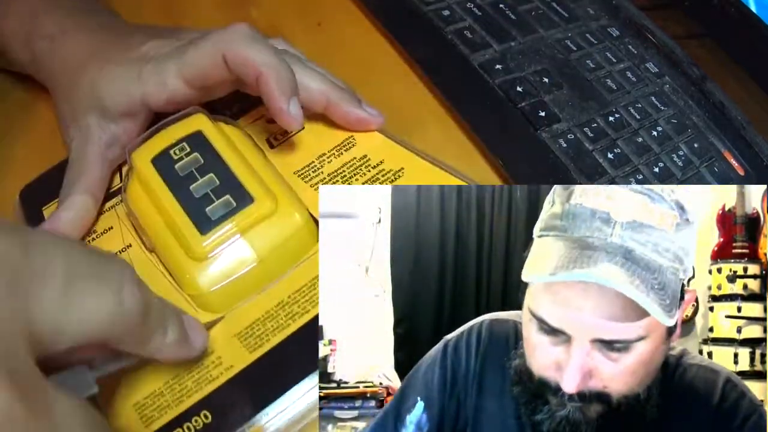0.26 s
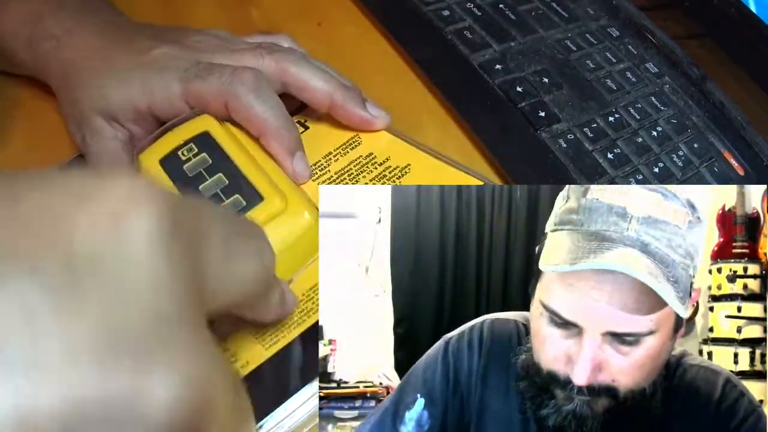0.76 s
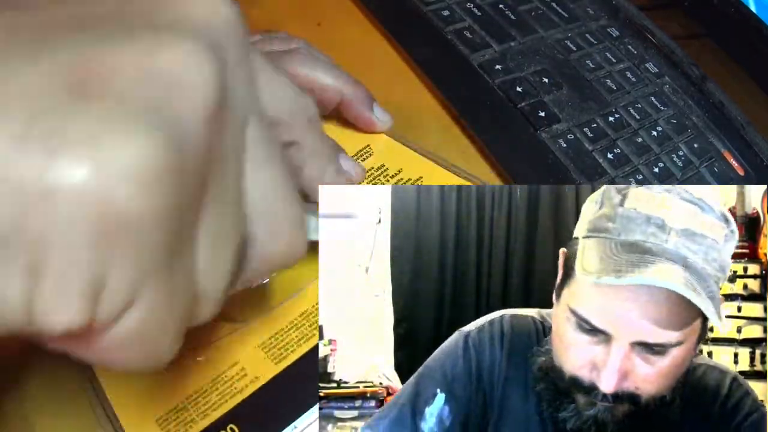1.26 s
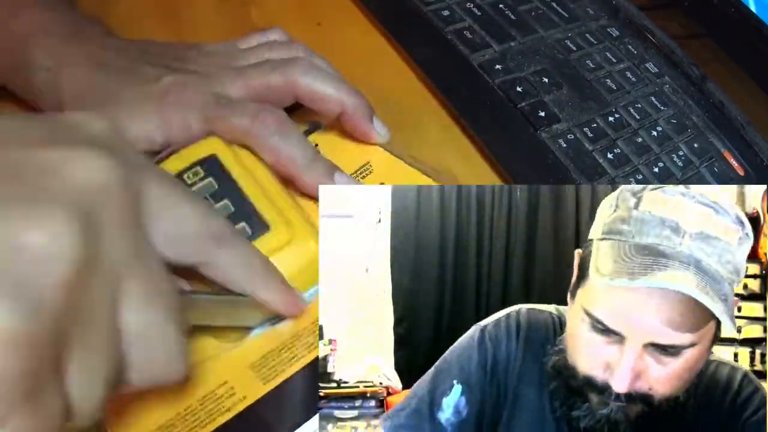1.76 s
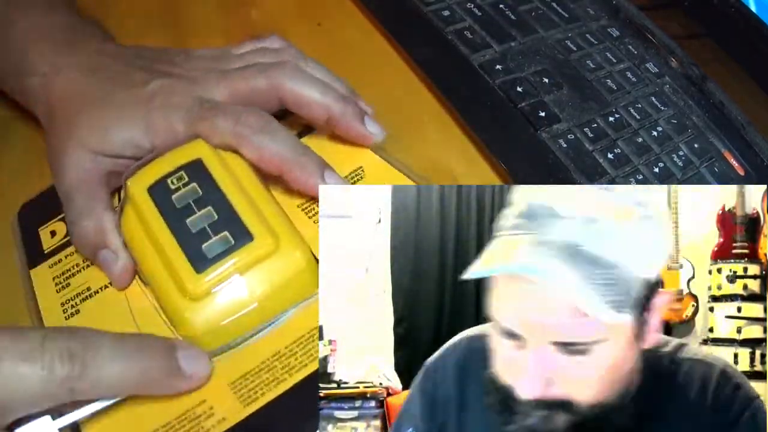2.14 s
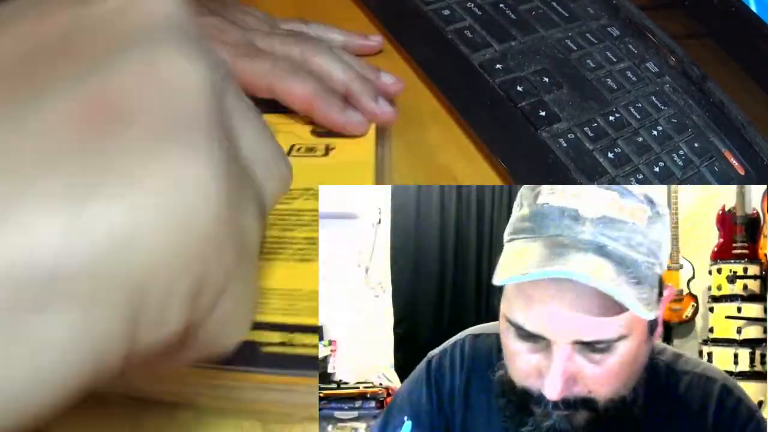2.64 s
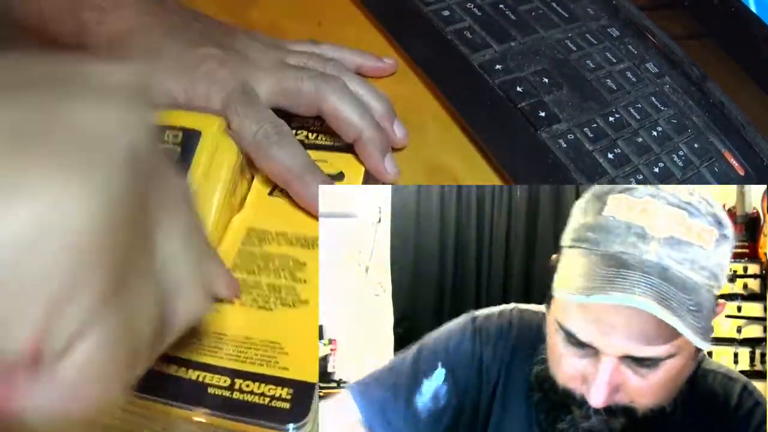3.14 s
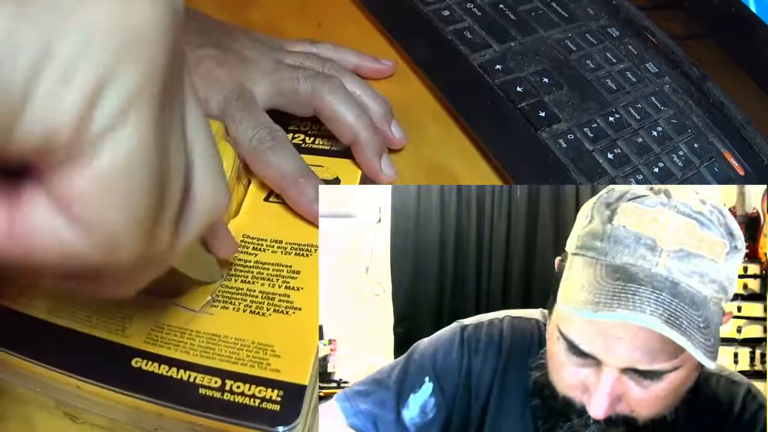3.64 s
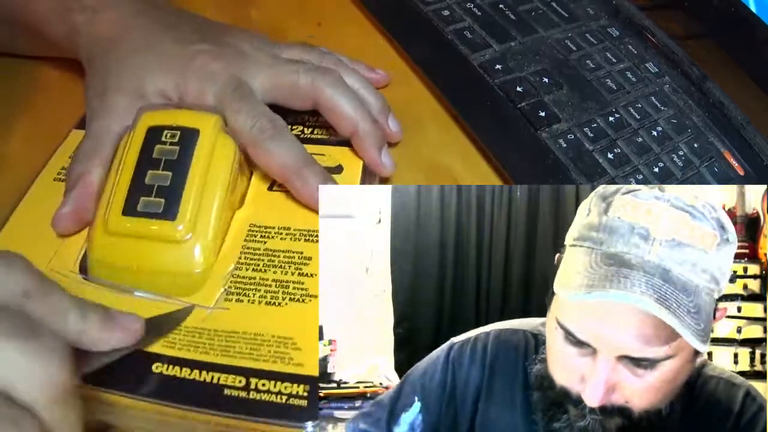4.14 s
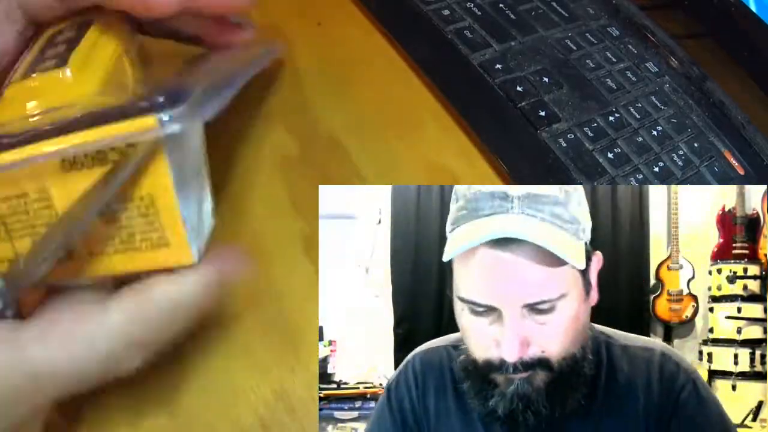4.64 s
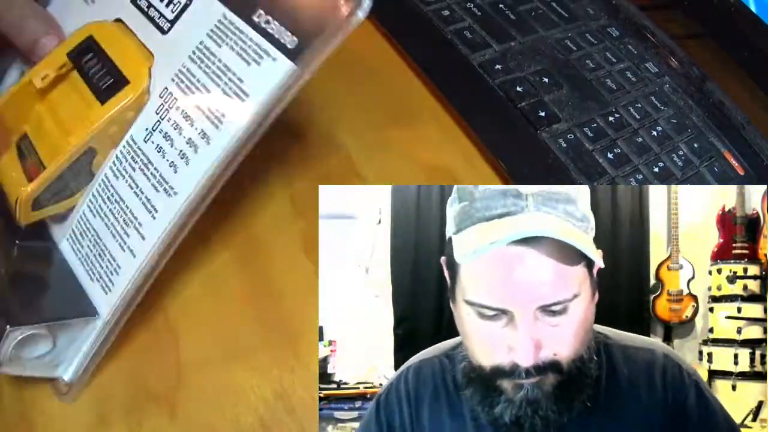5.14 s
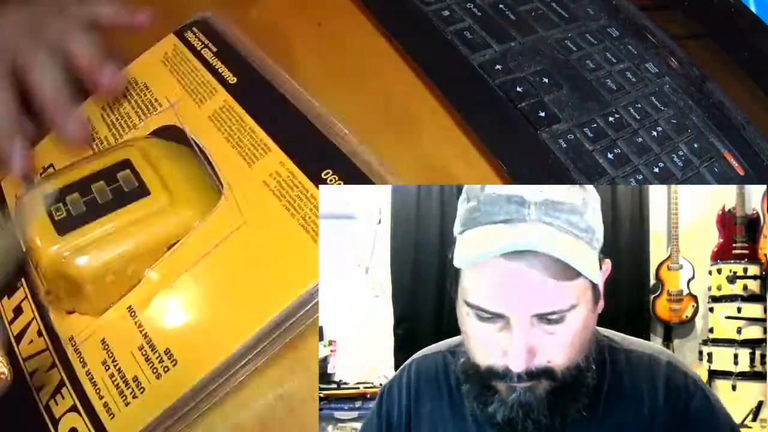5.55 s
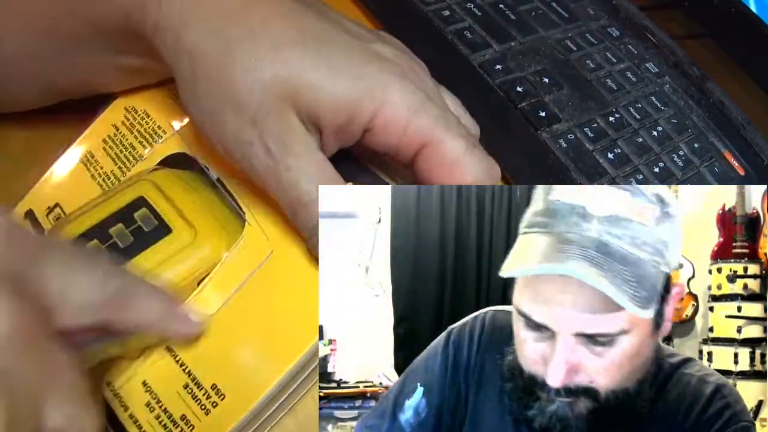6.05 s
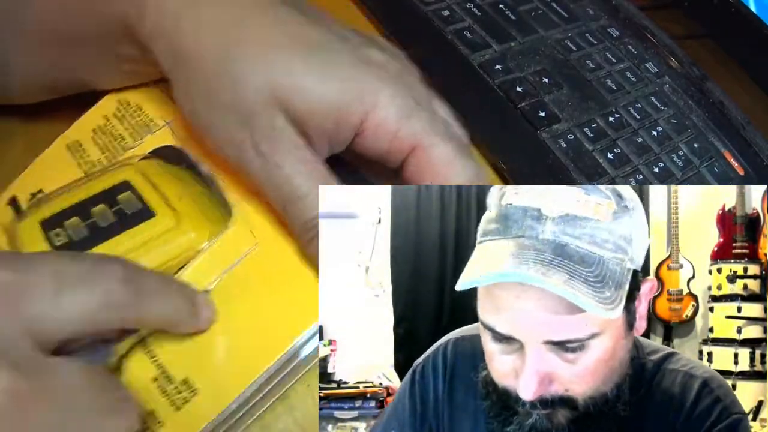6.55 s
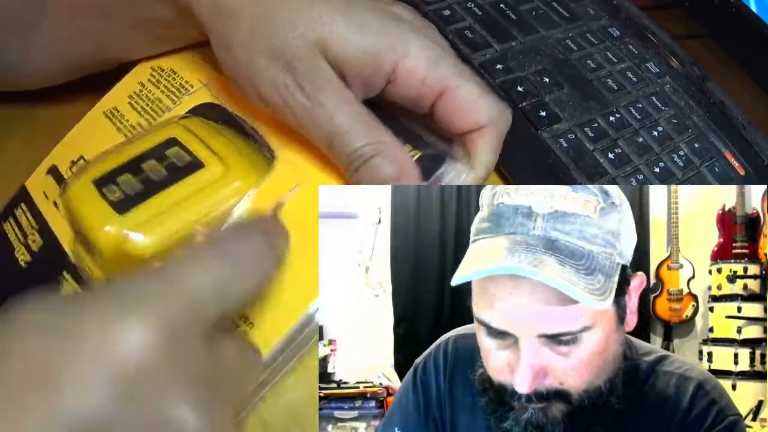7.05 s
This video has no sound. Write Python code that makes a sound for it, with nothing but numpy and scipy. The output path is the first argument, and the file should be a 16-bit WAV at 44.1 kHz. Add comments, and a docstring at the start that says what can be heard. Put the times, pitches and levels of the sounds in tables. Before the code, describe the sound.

Irregular crackling of hard clear plastic being cut and pried by hand, very close and dry with only tiny reflections. Light clicks grow into sharp pops, ease while the pack is shifted and knocked on the wooden desk, then return with rasping scrapes and loud snaps. A low rubbing rumble runs underneath, with steady quiet fan noise and thin whine, slightly more hum near the end.

```python
"""On a wooden desk, close to a small microphone, a blade pries a stiff plastic blister pack open.
Behind it, computer fans hiss (shaped noise), hum and whine (sine waves).
Desk and shell are sets of fading tones, or modes: random pushes make the desk rumble, bumps make it knock.
Scattered clicks make the shell creak, dense clicks scrape it, and sudden slips crack and pop it.
Short echoes surround the pack."""
import sys
import numpy as np
from scipy import signal
from scipy.fft import rfft, irfft
from scipy.io import wavfile
from scipy.ndimage import uniform_filter1d

SR = 44100
rng = np.random.default_rng(int(sys.argv[2]) if len(sys.argv) > 2 else 0)


def write(x):
    x = np.atleast_2d(x).T
    wavfile.write(sys.argv[1], SR, np.round(np.clip(x, -1, 1) * 32767).astype(np.int16))


N = 321930
TIME = np.arange(N) / SR


def gain_of(db):
    """Turn decibels into a multiplier for the sound wave."""
    return 10 ** (np.asarray(db) / 20)


def evened(x):
    """Scale a sound to an average (rms) strength of 1."""
    return x / np.sqrt(np.mean(x ** 2) + 1e-20)


def add(mix, start_s, sound):
    """Lay a sound into the mix at its start time, cut off at the end of the mix."""
    part = mix[max(round(start_s * SR), 0):][:len(sound)]
    part += sound[:len(part)]


def wander(fastest_hz):
    """Slow random curve of rms 1: twelve sine waves with random starting points."""
    t = TIME[::200]
    curve = sum(np.sin(2 * np.pi * (hz * t + rng.random()))
                for hz in np.geomspace(fastest_hz / 8, fastest_hz, 12))
    return np.interp(TIME, t, evened(curve))


def grit(clicks_per_s, spread_db):
    """Random clicks of either sign, a few of them large."""
    size = gain_of(spread_db * np.minimum(rng.exponential(1, N), 4))
    signed = size * rng.choice([-1., 1.], N)
    return signed * (rng.random(N) < clicks_per_s / SR)


def ring(modes, favour_hz=1, favour_db=0, width=1, size=768):
    """A part's answer to one click: modes near a favoured pitch ring louder; little radiates outside their range."""
    hz, level_db, t60_s = np.transpose(modes)[:, :, None]
    t = np.arange(size) / SR
    distance = np.log(hz / np.atleast_1d(favour_hz)) / width
    level_db = level_db + favour_db * np.exp(-distance ** 2).max(1, keepdims=True)
    sign = (-1) ** np.arange(len(modes))[:, None]
    waves = sign * gain_of(level_db - 60 * t / t60_s) * np.sin(2 * np.pi * hz * t)
    radiated_band = signal.butter(4, [0.66 * hz.min(), 1.57 * hz.max()], "band", fs=SR)
    return signal.lfilter(*radiated_band, waves.sum(0))


def octaves(part, hz):
    """How many octaves the middle of a part's modes lies above hz."""
    return np.mean(np.log2(np.transpose(part)[0] / hz))


def bent(part, favoured_hz, chance, reach=.12):
    """The part flexes until a mode sits on a favoured pitch within reach; else it flexes by chance."""
    # chance and reach are natural logs of a pitch ratio
    gaps = np.log(np.divide.outer(favoured_hz, np.transpose(part)[0])).ravel()
    nearest = gaps[abs(gaps).argmin()]
    stretch = np.exp(nearest if abs(nearest) < reach else chance)
    return np.multiply(part, [stretch, 1, 1])


def blow(slip, fall_db_per_ms, response, peak_db, first_db=12, rattle_db=-13, rattle_t60_s=.06):
    """One sudden slip, a spray of tiny ones and a faint rattle ring one part."""
    t = np.arange(len(slip)) / SR
    spray = gain_of(-max(fall_db_per_ms, .5) * 1000 * t)
    # harder breaks rattle more
    rattle = gain_of(rattle_db + 0.2 * peak_db - 60 * t / rattle_t60_s)
    soft_end = np.cos(np.pi / 2 * (t / t[-1]) ** 2)
    soft_start = np.minimum(t / 0.00041, 1) ** 2
    first_slip = gain_of(first_db) * np.exp(-((t - .0008) / .00003) ** 2)
    drive = slip * (spray + rattle) * soft_end * soft_start + first_slip
    sound = np.convolve(drive, response)
    return gain_of(peak_db) * sound / abs(sound).max()


# Colour of the fans' air noise: pitch_hz, relative_level_db (only the shape counts)
AIR_COLOUR = [(35, -68), (60, -30.5), (128, -14.5), (293, -82.5), (350, 0.5), (469, -34), (641, 6),
              (1120, -5.5), (1530, -3.5), (2190, -10), (2560, -2.5), (4890, -8), (10000, -16),
              (11700, -18.5), (12500, -55.5), (16200, -76), (22000, -120)]
# Blade tones: pitch_hz, level_db (rms, about which each wavers)
BLADE_TONES = [(240, -84), (301, -79), (479, -73), (603, -71), (646, -73), (926, -75), (958, -76)]
# Blade tones that join late: pitch_hz, level_db (rms, about which each wavers)
LATE_TONES = [(417, -72), (500, -74), (597, -76)]
# Motor whine, multiple of the base pitch: level_db (rms, before a shared wavering lift)
WHINE_TONES = {15: -82, 16: -79, 17: -75, 19: -84, 20: -78, 24: -83, 26: -80, 27: -83}
AIR_DB, WHINE_BASE_HZ, LATE_START_S = -61, 231.1, 5.55


def wavering(tones, sway_cycles):
    """Sine waves whose loudness and timing drift slowly."""
    return sum(gain_of(db + 1.5 * wander(3)) * np.sin(2 * np.pi * (hz * TIME + sway_cycles * wander(3)))
               for hz, db in tones)


def fans():
    """Steady air noise, wavering blade tones and a thin motor whine."""
    hz, level_db = np.transpose(AIR_COLOUR)
    colour_db = np.interp(np.log(np.fft.rfftfreq(N, 1 / SR) + 1), np.log(hz), level_db)
    noise = irfft(rfft(rng.standard_normal(N)) * gain_of(colour_db), N)
    air = gain_of(AIR_DB + 1.1 * wander(1.2)) * evened(noise)
    late_fade_in = np.clip((TIME - LATE_START_S) / 0.25, 0, 1)
    hum = wavering(BLADE_TONES, .08) + wavering(LATE_TONES, .1) * late_fade_in
    whine = sum(gain_of(db) * np.sin(2 * np.pi * (multiple * WHINE_BASE_HZ * TIME + rng.random()))
                for multiple, db in WHINE_TONES.items())
    whine_lift = gain_of(1.5 + 1.1 * wander(2.1))
    # a sine wave of rms 1 peaks at the square root of 2
    return air + np.sqrt(2) * (hum + whine_lift * whine)


# Modes of the desk top, before favouring and bending: pitch_hz, relative_level_db, t60_s (time to fade by 60 dB)
DESK_MODES = [(456.7, 6.5, 0.036), (561.4, 7.5, 0.029), (617.6, 9.5, 0.031), (693.3, 7.5, 0.033),
              (789, 5.5, 0.021), (970, 2, 0.022), (380, -14, 0.02)]
# Hands pressing the pack on the desk, joined by straight lines: time_s, level_db (rms)
RUMBLE_LEVELS = [(0, -54.5), (.5, -55), (1.15, -54), (1.5, -59.5), (2.3, -55.5), (2.55, -60), (2.72, -53),
                 (2.8, -46), (3.33, -50.5), (3.38, -57), (4.7, -56), (5.3, -56.5), (5.5, -50.5),
                 (5.62, -63), (6.05, -55.5), (6.2, -56.5), (6.5, -49.5), (6.75, -58), (7.3, -59)]


def rumble():
    """Rubbing hands give the desk many small uneven pushes that flutter."""
    flutter = gain_of(4.5 * wander(70))
    pushes = signal.oaconvolve(grit(900, 4.0) * flutter, np.hanning(8))[:N]
    desk = ring(DESK_MODES, favour_hz=697, favour_db=9, width=0.45, size=2048)
    rubbed = evened(signal.oaconvolve(pushes, desk)[:N])
    return gain_of(np.interp(TIME, *np.transpose(RUMBLE_LEVELS))) * rubbed


# Bumps on the desk: start_s, peak_db (of the ringing), pitch_hz (that the spot favours)
BUMPS = [(0.009, -37, 588), (0.02, -39.5, 470), (0.109, -34, 686), (0.178, -42, 589), (0.258, -40, 660),
         (0.334, -41.5, 610), (0.396, -36, 670), (0.487, -48, 760), (0.576, -33.5, 748), (0.617, -41, 620),
         (0.654, -36.5, 597), (0.753, -39.5, 636), (0.961, -32.5, 684), (1.192, -35, 462),
         (1.224, -32, 500), (1.251, -36.5, 503), (1.334, -30.5, 597), (1.392, -28, 482), (1.417, -28, 480),
         (1.612, -29, 504), (1.754, -21, 474), (1.87, -29, 482), (2.229, -30, 560), (2.242, -38, 630),
         (2.273, -36, 647), (2.33, -35, 506.6), (2.753, -35.5, 600), (2.78, -40, 659), (2.837, -34, 616),
         (2.885, -41, 582), (2.906, -41, 650), (2.938, -26.5, 481), (3.006, -41, 630), (3.08, -42, 650),
         (3.103, -41, 610), (3.136, -32.5, 625), (3.165, -36.5, 700), (3.203, -36, 600), (3.223, -40, 608),
         (3.265, -36, 636), (3.305, -42, 677), (3.56, -31, 474), (3.595, -35, 617), (3.936, -21, 492),
         (4.074, -45, 616), (4.089, -40, 603), (4.112, -25, 488), (4.352, -37, 515), (4.415, -27, 652),
         (4.71, -42, 950), (4.918, -25.5, 542), (4.983, -38.5, 547), (4.995, -34, 654), (5.184, -31, 482),
         (5.423, -35.5, 620), (5.458, -22.5, 676), (5.475, -23, 655.5), (5.487, -29.5, 650),
         (5.501, -37, 646), (5.519, -29.5, 671), (5.563, -22, 493), (5.818, -39.5, 585),
         (6.104, -35.5, 597), (6.151, -26, 443), (6.158, -37, 770), (6.487, -30, 558), (6.52, -36, 607),
         (6.605, -29.5, 577), (6.617, -28, 494), (6.817, -32, 455), (7.065, -38, 640), (7.275, -40, 471)]
PUSH_DB, PUSH_S = -40, .009  # low shove with each bump: level relative to the bump's peak, length


def knocks():
    """Soft bumps of pack and hands ring the desk top and send a low shove through it."""
    out = np.zeros(N)
    slips = rng.standard_normal((len(BUMPS), 600))
    for (start_s, peak_db, hz), slip in zip(BUMPS, slips):
        desk = ring(bent(DESK_MODES, [hz], 0), hz, favour_db=7.5, width=0.054, size=2048)
        soft_desk = np.convolve(desk, np.hanning(10))
        add(out, start_s - .001, blow(slip, 9.1, soft_desk, peak_db))
        shove = gain_of(peak_db + PUSH_DB) * np.hanning(round(PUSH_S * SR))
        add(out, start_s - .001, shove)
    return out


# Modes of the four shell parts, lowest part first, before favouring and bending:
# pitch_hz, relative_level_db, t60_s (time to fade by 60 dB)
CARD_MODES = [(1190, 2.5, 0.0068), (1530, 4.2, 0.011), (2041, 3.3, 0.012)]
DOME_MODES = [(2421, 0.5, 0.0072), (2687, 0, 0.0055), (3199, -4.5, 0.0093)]
RIM_MODES = [(3572, 2.5, 0.0071), (4330, 6, 0.0037), (4700, 5.5, 0.0056), (5063, 8, 0.0034),
             (5520, 3.5, 0.0063), (6180, 0, 0.0056)]
EDGE_MODES = [(7124, 7, 0.0015), (8320, 1.5, 0.0047), (8960, -1, 0.0046), (10250, 5, 0.0027),
              (11480, -2.5, 0.0056)]
SHELL = CARD_MODES, DOME_MODES, RIM_MODES, EDGE_MODES
TICKS_PER_S, TICKS_DB = 13, -73.5  # small creaks of the strained shell: rate and rms level in each part


def creaks():
    """Sparse small ticks of the strained shell, each ringing one of its three lower parts."""
    ticks = sum(evened(signal.oaconvolve(grit(TICKS_PER_S, 3.0), ring(part))[:N]) for part in SHELL[:3])
    return gain_of(TICKS_DB) * ticks


# Scrapes along the plastic: start_s, length_s, level_db (rms, for a part at the centre pitch, before fading),
# brightness_db_per_octave, hollowness_db_per_octave_squared
STROKES = [(0.317, 0.02, -67.5, 5.5, 6.5), (0.343, 0.015, -72, 13, 4), (0.362, 0.035, -56, 3.5, 3.5),
           (1.245, 0.05, -43.5, 1.5, 0.5), (1.299, 0.018, -62, 3, 2), (1.365, 0.02, -61.5, 0.5, 6.5),
           (1.389, 0.018, -54.5, 6.5, 1.5), (1.758, 0.024, -47, 3, 2), (1.892, 0.013, -53, -1, 3.5),
           (1.937, 0.039, -60.5, 0.5, 5.5), (3.126, 0.063, -47, 2, -5), (3.263, 0.024, -46.5, -2, 0.5),
           (3.555, 0.044, -56, -4, 2.5), (4.064, 0.03, -72, 8, 2), (4.504, 0.028, -47.5, -0.5, -3),
           (4.644, 0.026, -51, 1, -0.5), (4.889, 0.015, -70.5, 3.5, 11.5), (4.974, 0.026, -77.5, 1, 8),
           (5.4, 0.084, -66, 4, 7), (5.427, 0.051, -51, 0, 6), (6.181, 0.037, -49.5, -1.5, -1),
           (6.461, 0.02, -34.5, 2.5, -3.5), (6.598, 0.041, -37.5, -3, -3.5),
           (6.957, 0.13, -60.5, -0.3, -5.5), (7.27, 0.02, -49, -2, -1)]
SCRAPE_CENTRE_HZ = 3800
SCRAPE_FADE_DB = -3  # a scrape weakens along its length


def fading(size):
    """Quick start, slow weakening, soft end."""
    return signal.windows.tukey(size, .25) * gain_of(SCRAPE_FADE_DB * np.linspace(0, 1, size))


def scrapes():
    """Dense stick-slip clicks under the blade ring every part of the shell."""
    out = np.zeros(N)
    for part in SHELL:
        loudness = np.zeros(N)
        away = octaves(part, SCRAPE_CENTRE_HZ)
        for start_s, length_s, level_db, bright_db, hollow_db in STROKES:
            part_db = level_db + bright_db * away + hollow_db * away ** 2
            add(loudness, start_s, gain_of(part_db) * fading(round(length_s * SR)))
        response = ring(part, 2800, favour_db=8, width=.3)
        out += loudness * evened(signal.oaconvolve(grit(3500, 4.4), response)[:N])
    return out


# Cracks of the shell: start_s, peak_db (for a part at the leading pitch),
# pitch_hz (that the spot favours; several for rich breaks, the first leads), loss_below_db_per_octave,
# loss_above_db_per_octave (negative gains), fall_db_per_ms (of the break; at least 0.5 is used)
BREAKS = [(0.0425, -38, (2090, 2500), -20, 1.5, 20), (0.1087, -25.5, 2400, 19, 3, 5.5),
          (0.2391, -34.5, 2580, 13, 13, 3), (0.331, -34, 10000, 26, 4.0, 1),
          (0.4859, -25, 1970, 1, 4.0, 28), (0.5013, -15.5, 2470, 30, 4, 6),
          (0.575, -24.5, 2470, 11, 0.5, 7), (0.616, -37, 2580, 11.0, 6, 4.5),
          (0.6382, -36, 2500, 3, -0.5, 4), (0.6556, -35, 2620, 6, 0, 3.5), (0.7728, -32, 2670, 10, 6, 23),
          (0.852, -32.5, 2450, -1, 1, 4), (0.8745, -32.5, 10100, 8, 4.0, 2),
          (0.8941, -24.5, 2490, 22, 7.5, 4), (0.9617, -26, (1550, 6300), 10.0, 3, 6),
          (1.0488, -22.5, (1490, 2530), 1, 3.5, 15), (1.1895, -33.5, 2546, 20, 10, 2.0),
          (1.224, -22.5, (2600, 4200), 22, 6.5, 5), (1.2457, -33, 2070, -10, 9, 9),
          (1.2532, -31, 2970, 7, 6, 1), (1.3087, -43, 3000, 12, 5, 1.5), (1.334, -27, 5470, -0.5, -2, 3.5),
          (1.3425, -27, 2580, 8, 2.5, 19), (1.3561, -31.5, 2630, 6.0, 5, 30.0),
          (1.3928, -36, 1450, 10.0, 0, 4), (1.417, -44, 1950, -16, -0.5, 2.5),
          (1.4701, -39, 3130, 1, -1.5, 1.5), (1.4809, -32.5, 2400, 11, 6, 2), (1.6112, -17.5, (1460, 5600),
          10.0, 3, 5.5), (1.7092, -42.5, 3200, -2, -0.5, 2), (1.7365, -36, 2020, 1.0, 11, 2.5),
          (1.7549, -29.5, 2480, 3, 5, 0.5), (1.765, -23.5, 2700, -7, -3, 1),
          (1.769, -8.5, (5200, 1480, 8360), 3.5, 0.5, 12), (1.7937, -21.5, 6800, 4.5, -2, 17),
          (1.8675, -19.5, 1460, 10.0, 1, 6.5), (1.8711, -19.5, 3900, 3.5, 9, 19),
          (1.9308, -26, 2230, -2, -1, 6), (1.955, -34, 1440, 13, 4.5, 1.5),
          (2.0475, -28.5, 2100, -1, 2, 23), (2.1475, -6, 3470, 39, 23.5, 26),
          (2.2305, -18, 3570, 8, 16, 30.0), (2.2479, -5, 3600, 43, 12.5, 32),
          (2.3211, -15.5, 3480, 18, 11, 2), (2.33, -3, (4440, 3100), 13, 4.5, 26),
          (2.3579, -11, (8300, 3370), 9, 7, 17.5), (2.3978, -37.5, 2530, 13, 5, 2),
          (2.6327, -28.5, 1570, 13, 4.5, 2), (2.69, -38.5, 2540, 5.5, -1, 14),
          (2.7228, -36, 2680, 14, 18, 3), (2.7355, -30, 2630, 9, 10, 2), (2.8323, -38.5, 2700, -3, 2, 1),
          (2.839, -33, 1795, -25, 0, 5), (2.9358, -15.5, 4030, 6, 9.5, 24),
          (2.9397, -16.5, 1470, 10.0, 4.5, 6), (2.9508, -32.5, 2580, 1, 9, 2), (2.97, -38, 2500, 6, 7, 4),
          (2.9828, -35, 1600, 9.0, 8, 7), (3.0183, -27.5, 1804, -8, 8, 30.0),
          (3.1322, -23, 3100, 1.5, 1.5, 1), (3.1485, -11, 7600, 23, -1, 26), (3.1648, -12, (2580, 1930),
          8.5, 20, 33), (3.206, 2, (5560, 10400, 3280), 18, 13.5, 10), (3.243, -40, 4000, 16, 10, 2),
          (3.266, -31, 3330, -0.5, 4, 11), (3.272, -22.5, 1590, 10.0, 4, 30.0),
          (3.3119, -35, 2850, 11, 10.0, 2), (3.3465, -15.5, (3280, 8600), 18, 3, 32),
          (3.4455, -28.5, 3596, 9, 25, 1), (3.4716, -35, 8440, 7, 0.0, 15), (3.543, -39, 3590, 2, 22, 0),
          (3.549, -24, 3600, 10, 19, 14.0), (3.556, -27, 3270, 6, 19, 2), (3.5613, -32.5, 2680, 13, 1, 7),
          (3.5719, -34.5, 1700, -5.0, -0.5, 2), (3.5793, -30, 3730, 20, 9, 13),
          (3.5876, -16, 4880, 5.5, 30, 7), (3.612, -38.5, 1570, 10, 20, 2),
          (3.672, -31.5, 8100, 4, 11, 3.5), (3.7325, -28.5, 1600, 10.0, -2, 3),
          (3.7705, -21, 7600, 30, -10, 26), (3.8014, -26, 5300, 2, 5, 36), (3.9061, -17, (3800, 2460),
          11, 11.5, 35), (3.9371, -6.5, (2560, 4330, 1400), 6.5, 5.5, 13.5), (3.9948, -22, (3330, 2230),
          2.5, 1, 32), (4.0665, -34.5, 11300, 12, 4.0, 1), (4.1132, -17, (3700, 1300), 0.5, 8.5, 26),
          (4.355, -27.5, (1900, 4060), 5, -0.5, 24), (4.4156, -28, (1380, 5640), 11, 0.5, 4),
          (4.5072, -20, 7230, 7, 3, 3), (4.6267, -34.5, 3200, 8, -1.5, 15), (4.6343, -18.0, (3000, 2200),
          6.5, 16, 16), (4.6475, -21.5, 6290, 14, 8, 0.5), (4.6568, -21, 2570, 24.5, 14, 14.0),
          (4.661, -19.5, 2930, 10.5, 19, 4.5), (4.7101, -23.5, (2350, 1290), -7.5, 6.5, 24),
          (4.835, -39, 2120, 7, 15, -0.5), (4.8475, -35, 2350, 11, 15, 5), (4.874, -37, 2150, 5.5, 23.5, 1),
          (4.9186, -17.5, 1250, 12, 24, 11), (4.9844, -39.5, 1310, 10, 21, 4),
          (4.998, -37.5, 1480, 10, 21, 7), (5.1004, -32, (2930, 1650), 2.5, 19, 15),
          (5.166, -28.0, 5400, 28, 21, 1.5), (5.1818, -28, (1200, 3040), 10, 7, 3),
          (5.4512, -24, 1480, 7, 0, 10), (5.4581, -16, (2550, 1260, 5200), 1.5, 1, 30.0),
          (5.4712, -17.5, (2430, 1310), 11, 6, 10.0), (5.5189, -27.5, 1430, 10.0, 7.5, 15),
          (5.5634, -13.5, (2390, 1330, 3880), 8.5, 5.5, 2.5), (5.575, -26, 2640, 8, 13, 4),
          (5.7024, -21, 2450, 17, 9, 18), (5.7246, -31, 6600, 8.5, 16, 6), (5.7957, -18.5, (2560, 4140),
          11.5, 1.5, 8), (5.8883, -35.5, 1510, 8, 14, 5.5), (5.9616, -38.5, 1990, -11.0, 14.5, 9),
          (6.1022, -19.5, (2800, 4350), 11, 2, 31), (6.109, -21, 6560, 13, 4, 6),
          (6.128, -29, 2650, 4.5, 12, 15.5), (6.1473, -23, 1980, 9, 4, 1), (6.1564, -27.5, 2830, -5, 1, 5),
          (6.1667, 3.5, (5140, 8700), 24.5, 11.5, 8.5), (6.2005, -30, 4460, 16, 4, 1),
          (6.219, -33.5, 2050, -6, 8.0, 10.0), (6.2463, -22.5, 3160, 31.0, 0, 27),
          (6.3269, -21, 2970, 19, 7.5, 15), (6.3618, -28.5, 2550, 12, 0.5, 26), (6.389, -7.5, (3920, 10200),
          14, 2.5, 23), (6.4108, -30, 2070, 20.0, 9, 9.5), (6.428, -28.5, 2580, 2, 7, 22),
          (6.4636, -18.5, 4520, 12, 19, 2), (6.4865, -15, (2420, 5100), 14, 2.5, 25),
          (6.5227, -15, (5020, 2600, 7600), 11, -0.5, 4.5), (6.5518, -18.5, 2546, 17, 9, 32),
          (6.5762, -27, 2560, 14, 11, 28.0), (6.605, -20.5, 2560, 11, 1, 1.5),
          (6.6165, -4.5, (2240, 2000, 3600), 6.5, 5.5, 2), (6.7548, -27, 10850, 6, 3, 1.5),
          (6.7619, -19.5, 3890, 7.5, -0.5, 6.5), (6.79, -25, 6900, 7, -15, 7), (6.818, -20, 6740, 4, 9, 5),
          (6.8685, -30, 3960, 13.5, -3, 14), (6.8935, -32, 4570, 8, -1, 3), (6.9303, -20, 3140, 23, 21, 9),
          (6.9513, -18, 3770, 23, 9.5, 25), (6.9603, -29, 2350, 16, 13, 6),
          (6.9756, -34, 8400, 10.0, 9, 3.5), (6.9862, -20, 3770, 32.0, 9.5, 2.5),
          (7.0105, -31.0, 2060, 7, 14.5, 14), (7.0967, -6, (2390, 3350, 7570), 23, -1.5, 14),
          (7.1283, -17, (2580, 4400), 37, 1, 24), (7.144, -29, 2610, 21, 11, 1.5),
          (7.1745, -38, 3140, 3, 5.5, 2.5), (7.2288, -25.5, 2544, 22, 1.5, 17),
          (7.286, -32, 2520, 24, 14, 17.5)]


def cracks():
    """Each break rings all shell parts, most the one tuned near its spot, bent a little differently every time."""
    out = np.zeros(N)
    slips = rng.standard_normal((len(BREAKS), 1100))
    bends = rng.standard_normal((len(BREAKS), len(SHELL)))
    for (start_s, peak_db, hz, below_db, above_db, fall_db), slip, bend in zip(BREAKS, slips, bends):
        hz = np.atleast_1d(hz)
        for part, shift in zip(SHELL, bend):
            away = octaves(part, hz[0])
            part_db = peak_db + below_db * min(away, 0) - above_db * max(away, 0)
            response = ring(bent(part, hz, 0.069 * shift), hz, favour_db=8, width=0.067)
            # the main slip comes 0.8 ms into the blow
            add(out, start_s - .0008, blow(slip, fall_db, response, part_db))
    return out


def surroundings(x, t60_s=0.032, bright_t60_s=0.022):
    """Echoes off desk, hands and screen: dense taps of random sign, the treble dying first."""
    t = np.arange(3000) / SR
    taps = rng.choice([-1., 1.], len(t)) * (rng.random(len(t)) < .25) * (t > .0015)
    low = signal.lfilter(*signal.butter(2, 3000, fs=SR), taps)
    bright = taps - low
    tail = low * gain_of(-60 * t / t60_s) + bright * gain_of(-60 * t / bright_t60_s)
    return signal.oaconvolve(x, tail / np.linalg.norm(tail))[:N]


def scene():
    """Pack with its faint echoes, plus the desk and the fans."""
    pack = cracks() + scrapes() + creaks()
    echoes = gain_of(-16.0) * surroundings(pack)
    return (pack + echoes + knocks() + rumble() + fans())[None]


TOP_HZ = 12100  # the band limit


def record(dry):
    """The input stage rounds off peaks near full scale and drops the deep bass; then the band limit."""
    rounded = np.tanh(dry / 1.1) * 1.1
    # the slow part of the rounding is taken out, so that it adds no low thump
    thump = uniform_filter1d(rounded - dry, 200)
    thin = signal.lfilter(*signal.butter(1, 110, "high", fs=SR), rounded - thump)
    band_limit = signal.firwin(255, TOP_HZ, window=("kaiser", 8), fs=SR)[None]
    return signal.oaconvolve(thin, band_limit, "same")


dry = scene()
out = record(dry)
write(out)
```